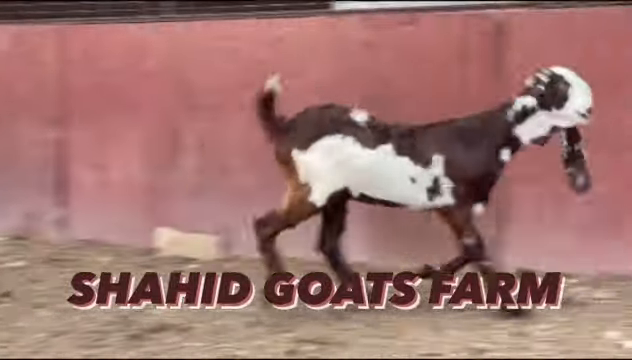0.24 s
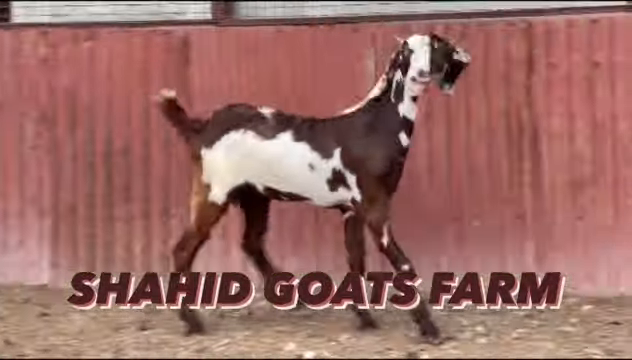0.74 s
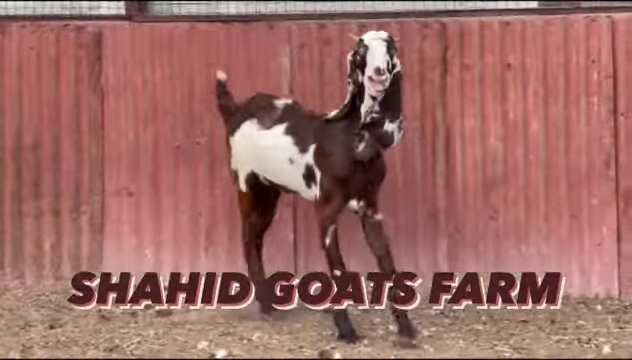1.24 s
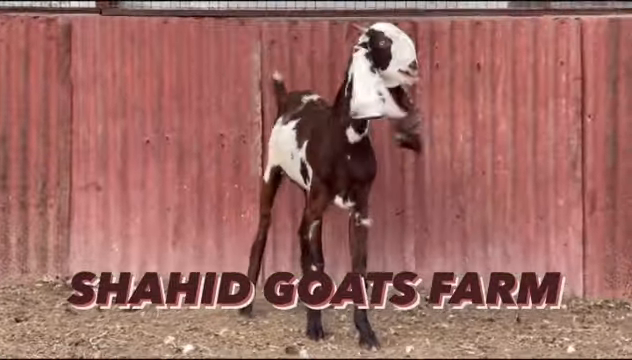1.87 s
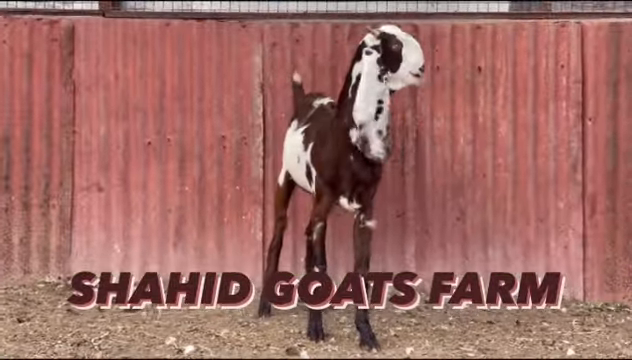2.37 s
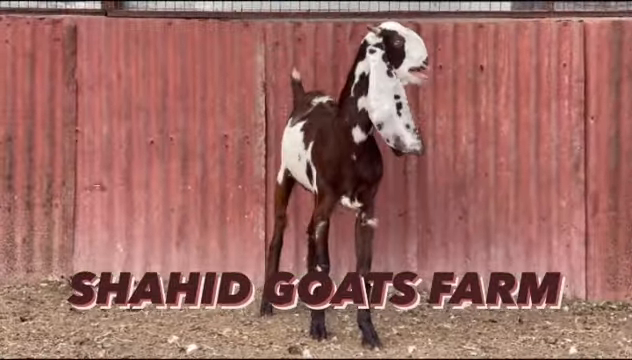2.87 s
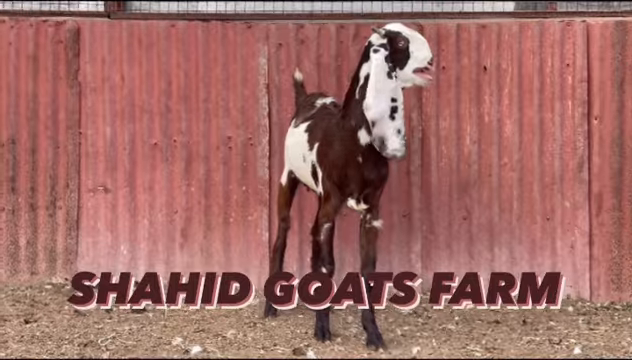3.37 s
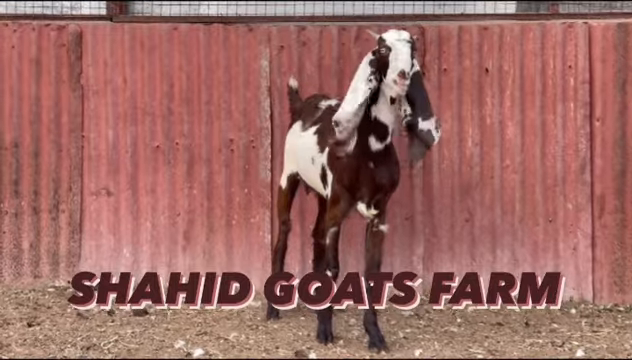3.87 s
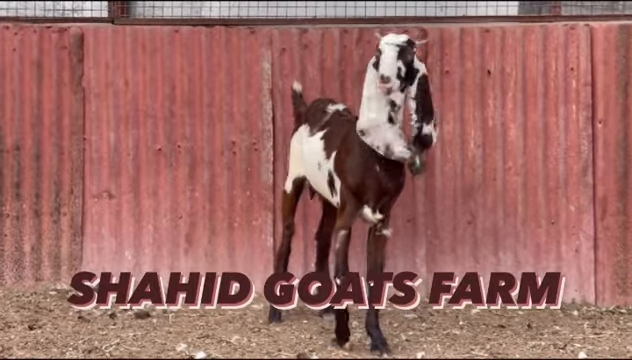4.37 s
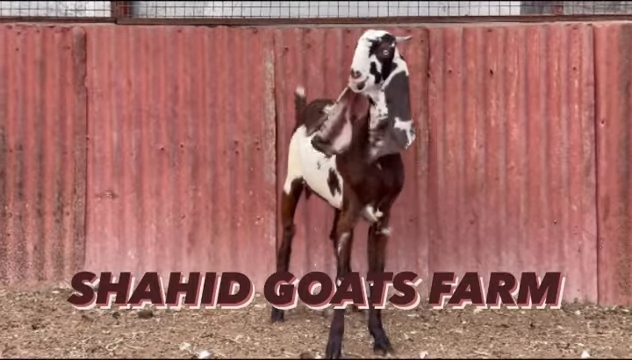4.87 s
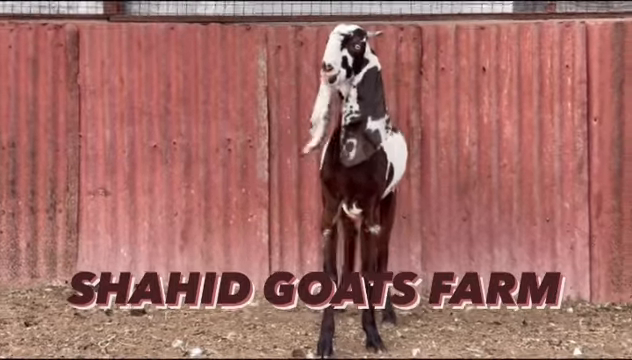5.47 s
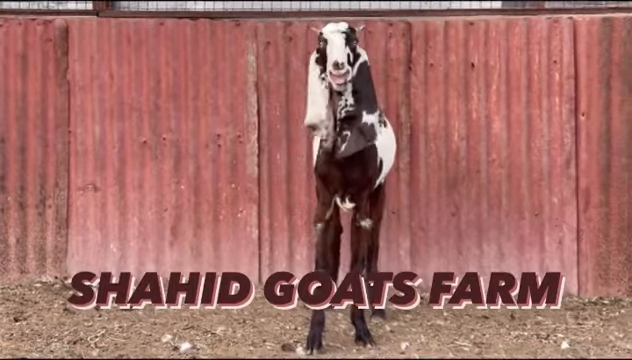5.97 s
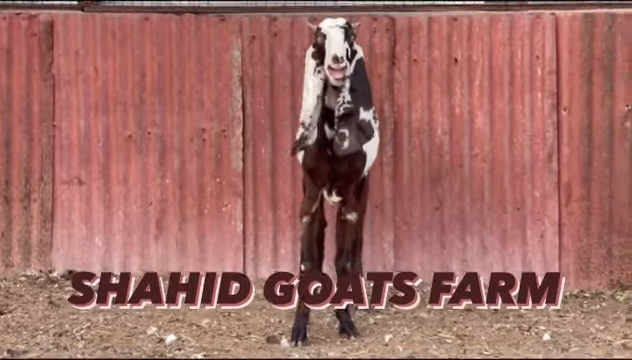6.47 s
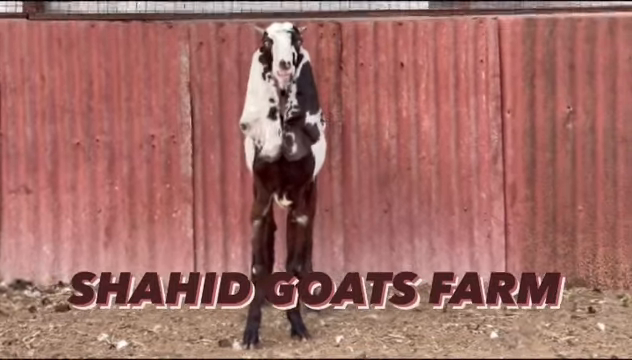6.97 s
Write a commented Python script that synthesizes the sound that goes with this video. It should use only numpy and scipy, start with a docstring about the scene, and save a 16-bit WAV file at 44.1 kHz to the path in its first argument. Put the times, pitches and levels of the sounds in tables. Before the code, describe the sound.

A young goat calls three times, about a second each, nasal and bright with a rapid tremble and an abrupt closing end. The first begins with a rough grunt. After the second, dull thumps and crisp clicks like hooves shifting interrupt the quiet, then the last bleat comes. Distant birds chirp faintly over soft rumble, rustle and hiss. Phone pickup, open air, short metal-fence echoes.

```python
"""A goat kid bleats three times in a dirt pen with a sheet-metal fence, a few metres from a phone.
Fold pulses and breath ring its throat: each bleat starts low, jumps to its pitch, and is shaken by pushes
of breath that lift the pitch and open the throat. Ground and fence echo it.
Noise bursts and damped rings make thuds, booms, ticks and a rough grunt; far birds sing in sine notes;
behind lies the yard, shaped noise that rumbles, hisses, rustles and carries hoarse far-off calls."""
import sys
import numpy as np
from scipy import signal
from scipy.fft import rfft, irfft, next_fast_len
from scipy.io import wavfile

SR = 44100
rng = np.random.default_rng(int(sys.argv[2]) if len(sys.argv) > 2 else 0)


def wav_out(sig):
    """Save sig, one row per channel (or a flat mono array), as 16-bit PCM at SR to the path in sys.argv[1]."""
    wavfile.write(sys.argv[1], SR, np.round(np.clip(np.atleast_2d(sig).T, -1, 1) * 32767).astype(np.int16))


N = 318402
T = np.arange(N) / SR
SIDES = np.array([[1], [-1]])  # left, right
TOP_HZ = 11900  # the scene is rendered up to this frequency


def undb(db):
    """Decibels to gain."""
    return 10 ** (np.asarray(db) / 20)


def unit(x):
    """Scale to rms 1."""
    return x / np.sqrt(np.mean(x ** 2))


def filtered(x, response):
    """Pass a sound through a response given as a function of frequency."""
    n = x.shape[-1]
    size = next_fast_len(n + SR // 10, True)
    hz = np.maximum(np.arange(size // 2 + 1) * SR / size, 1)
    return irfft(rfft(x, size) * response(hz), size)[..., :n]


def lowpassed(x, cut_hz):
    """Keep what lies below a cut, without delay."""
    return filtered(x, lambda f: 1 / (1 + (f / cut_hz) ** 4))


def resonate(x, hz, width):
    """One resonance, gain 1 at its centre."""
    return filtered(x, lambda f: 1 / (1 + 1j * (f / hz - hz / f) * hz / width))


def walk(rate, size):
    """Smooth chance that changes about rate times a second; spread 1."""
    return unit(filtered(rng.standard_normal(size), lambda f: 1 / (1 + (f / rate) ** 2)))


def bell(t, centre, half):
    """A smooth rise and fall."""
    return np.exp(-((t - centre) / half) ** 2)


def add(track, s, x):
    """Mix a sound into a track from time s on."""
    i = max(int(s * SR), 0)
    track[..., i:i + x.shape[-1]] += x[..., :N - i]


def colour(f, rows):
    """Join (Hz, value) rows by straight lines on a log-frequency axis."""
    hz, value = np.transpose(rows)
    return np.interp(np.log(f), np.log(hz), value)


def swell(s, half, hz, width):
    """A narrow band of noise rises and falls."""
    band = resonate(resonate(rng.standard_normal(N), hz, width), hz, width)
    return bell(T, s, half) * unit(band)


YARD_DB, HISS_DB = -59, -1  # the whole yard before its bands are weighted; steady hiss relative to that
RUMBLE_WIDTH_HZ, RUMBLE_S = 21, 0.12  # bandwidth and half length of each brief rumble
FAR_CALL_HZ, FAR_CALL_WIDTH_HZ, FAR_CALL_S = 2100, 500, 0.11  # centre, bandwidth, half length
# Spectrum of the yard's air. Each row: frequency in Hz, relative level in dB per Hz.
YARD_COLOUR = [(15, -38), (25, -27), (49, -1), (149, -8.5), (262, -9), (283, -11), (386, -6.5), (718, -15),
               (2240, -18.5), (4610, -28), (5820, -27), (6290, -31.5), (8800, -25.5), (12000, -38.5),
               (15600, -96), (22000, -120)]
# Rumble of the yard over time. Each row: time in seconds, level in dB over the yard's own.
RUMBLE_LEVEL = [(0, 1.5), (1.5, 8), (2.3, 7), (3.8, 5.5), (4.05, 3), (4.8, 7), (5.45, -2.5), (6.2, 4.5)]
# Soft rustle from movement in the pen. Each row: centre in seconds, half length in seconds, dB over the hiss.
RUSTLES = [(0.206, 0.67, 5.5), (4.47, .22, 11), (6.65, 0.34, 6)]
# Brief swells of rumble. Each row: centre in seconds, frequency in Hz, level in dB.
RUMBLES = [(1.373, 55.1, -53), (2.01, 145.2, -55.5), (7.08, 52, -46)]
# Hoarse far-off calls. Each row: centre in seconds, level in dB.
FAR_CALLS = [(2.2, -62.5), (6.775, -53)]


def yard(side_db=-14, swell_db=1, rumble_swell_db=3.0):
    """Distant rumble and hiss waver, nearly alike on both sides, with rustles and noise-band far calls."""
    mid, side = (unit(filtered(rng.standard_normal(N), lambda f: undb(colour(f, YARD_COLOUR))))
                 for _ in range(2))
    air = undb(YARD_DB) * (mid + SIDES * undb(side_db) * side)
    low = lowpassed(air, 200)
    high = air - lowpassed(air, 3000)
    middle = air - low - high
    rumble_db = np.interp(T, *np.transpose(RUMBLE_LEVEL))
    hiss_db = HISS_DB + sum(db * bell(T, s, half) for s, half, db in RUSTLES)
    out = low * undb(rumble_db + rumble_swell_db * walk(15, N))
    out = out + high * undb(hiss_db + swell_db * walk(10, N))
    out = out + middle * undb((rumble_db + hiss_db) / 2 + swell_db * walk(16.0, N))
    for s, hz, db in RUMBLES:
        out = out + undb(db) * swell(s, RUMBLE_S, hz, RUMBLE_WIDTH_HZ)
    for s, db in FAR_CALLS:
        out = out + undb(db) * swell(s, FAR_CALL_S, FAR_CALL_HZ, FAR_CALL_WIDTH_HZ)
    return out


def pen(x, t60, treble_t60, split_hz=3500, side_db=-10):
    """Fence and sheds scatter echoes, a little different per side; bass and treble die at their own rates."""
    t = np.arange(SR) / SR
    mid, side = rng.standard_normal((2, SR)) * np.clip((t - .004) / 0.037, 0, 1)
    noise = mid + SIDES * undb(side_db) * side
    low = lowpassed(noise, split_hz)
    tail = low * np.exp(-np.log(1000) * t / t60)  # down 60 dB at t60 seconds
    tail = tail + 0.26 * (noise - low) * np.exp(-np.log(1000) * t / treble_t60)
    return signal.fftconvolve(x[None], tail / np.sqrt(np.sum(tail ** 2) / 2), axes=1)[:, :N]


def note(length, hz, fall, octave_db, waver=0.0078, flutter_db=3, hold=2.8):
    """A fluttering sine note holds, then falls, with its octave above."""
    u = np.linspace(0, 1, int(length * SR))
    pitch = hz * (1 - fall * u ** hold + waver * walk(120, len(u)))
    phase = 2 * np.pi * np.cumsum(pitch) / SR
    size = undb(flutter_db * walk(80, len(u))) * np.sqrt(u * (1 - u)) * 2
    return size * (np.sin(phase) + undb(octave_db) * np.sin(2 * phase))


# The bird's phrase, each note higher than the last. Each row: pitch ratio, length in seconds,
# share by which it falls, level in dB, octave in dB relative to the note.
NOTES = [(1, .068, .18, 0, -5), (1.25, .072, .22, -0.5, -11), (1.61, .04, 0.26, -6.5, -20)]
# Each time it sings. Each row: start in seconds, pitch in Hz, level in dB, time between note starts
# in seconds, extra level of the later notes in dB.
PHRASES = [(.247, 3396, -55, 0.044, -3.5), (2.424, 3710, -52.5, 0.06, 3.5), (4.295, 3680, -58, .068, -22),
           (6.702, 3720, -49.5, 0.07, -3)]
# Thin, nearly level whistles. Each row: start in seconds, length in seconds, pitch in Hz, level in dB.
WHISTLES = [(0.798, 0.33, 6330, -47.5), (5.011, .25, 5880, -70.5), (7.03, 0.18, 2780, -67)]


def birds(echo_s=0.021, echo_db=-5):
    """Far birds: phrases of three falling notes and a few thin whistles; a wall repeats them once."""
    song = np.zeros(N)
    for s, hz, db, gap_s, later_db in PHRASES:
        for k, (ratio, length, fall, note_db, octave_db) in enumerate(NOTES):
            level = undb(db + note_db + later_db * (k > 0))
            add(song, s + k * gap_s, level * note(length, hz * ratio, fall, octave_db))
    for s, length, hz, db in WHISTLES:
        add(song, s, undb(db) * note(length, hz, fall=0.0092, octave_db=-30, waver=0.0047))
    out = song.copy()
    add(out, echo_s, undb(echo_db) * song)
    return out


def crack(t, hz, width, decay_s, grit_db=4, skirt=2.6):
    """A rough burst of band-limited noise that dies quickly."""
    grit = rng.standard_normal(len(t)) * undb(grit_db * walk(600, len(t)))
    return unit(resonate(resonate(grit, hz, width), hz, skirt * hz)) * np.exp(-t / decay_s)


SETTLE_DB, SETTLE_S = -19.5, 0.04  # level and decay of the rumble that follows each thud


def thud(t, hz, decay_s):
    """The first swing is clean, then the ring breaks up into a broad rumble that settles."""
    rumble = unit(resonate(rng.standard_normal(len(t)), hz, hz))
    swing, fade = np.exp(-t * hz / 4), np.exp(-t / decay_s)
    ring = swing * fade * np.sin(2 * np.pi * hz * t)
    settling = 0.87 * fade + undb(SETTLE_DB) * np.exp(-t / SETTLE_S)
    return lowpassed(ring + (1 - swing) * rumble * settling, 2 * hz)


CRACK_HZ, CRACK_WIDTH_HZ = 2240, 1400
THUD_CYCLES, BOOM_CYCLES = 1.25, 3.3  # swings in which the fade drops to 1/e
# Knocks and thuds; a hoof lands at .667 as the first bleat begins. Each row: start in seconds, thud in dB, thud
# in Hz, crack in dB, crack decay in seconds.
KNOCKS = [(.046, -25, 198, -58.5, .01), (.667, -26, 224, -44.5, 0.057), (4.157, -28.5, 310, -47, 0.0038),
          (4.4331, -10.5, 367, -30, 0.0042), (4.4578, -24, 420, -40, .012), (4.519, -44, 380, -37.5, .004),
          (4.542, -34, 443, -42, 0.0054), (4.659, -29.5, 282, -39, 0.011)]
# Deep booms. Each row: start in seconds, level in dB, frequency in Hz.
BOOMS = [(4.165, -39.5, 66), (4.426, -23, 128), (4.454, -33, 120), (4.67, -29.5, 61.6), (4.826, -43, 55)]
# Ticks and scrapes: short noise bursts, among them a rough grunt at .636 and lips parting at 5.714.
# Each row: start in seconds, level in dB, centre in Hz, decay in seconds.
TICKS = [(.041, -45, 1000, .003), (.636, -41, 710, 0.05), (4.1585, -35, 1200, 0.0065),
         (4.2445, -26.5, 3830, 0.0016), (4.268, -47, 3460, 0.0041), (4.415, -45, 2800, 0.015),
         (4.432, -24, 8100, .002), (4.625, -30, 10100, 0.0011), (4.651, -44.5, 6900, 0.0063),
         (5.497, -52, 6540, .004), (5.579, -51.5, 7100, 0.0071), (5.714, -34.5, 7160, 0.0054)]


def knocks():
    """Rough cracks over soft, damped thuds, with deep booms and short noise bursts; a grunt is among them."""
    out, t = np.zeros(N), np.arange(SR // 3) / SR
    for s, thud_db, thud_hz, crack_db, crack_s in KNOCKS:
        add(out, s, undb(thud_db) * thud(t, thud_hz, THUD_CYCLES / thud_hz))
        add(out, s, undb(crack_db) * crack(t, CRACK_HZ, CRACK_WIDTH_HZ, crack_s))
    for s, db, hz in BOOMS:
        add(out, s, undb(db) * thud(t, hz, BOOM_CYCLES / hz))
    for s, db, hz, decay_s in TICKS:
        add(out, s, undb(db) * crack(t, hz, 0.54 * hz, decay_s))
    return out


# Phase between the two microphone ports. Each row: frequency in Hz, lead of the left in radians.
PORT_PHASE = [(100, -0.5), (350, 0.15), (900, 0.42), (1900, 0.16), (3300, 0.79), (5500, 0.33),
              (7200, -1.16), (8300, -0.5), (9700, -2.5), (12000, -1.6)]
# Level between the ports. Each row: frequency in Hz, left minus right in dB.
PORT_BALANCE = [(150, 7), (380, -2), (700, 1), (1300, 5), (2400, -0.5), (4400, 0), (8000, 0)]


def ports(x):
    """A sound from the front reaches the two ports with a difference in level and phase."""
    def response(f):
        """Half the difference goes to each side, with opposite sign."""
        return undb(SIDES * colour(f, PORT_BALANCE) / 2) * np.exp(1j * SIDES * colour(f, PORT_PHASE) / 2)
    return filtered(x, response)


def folds(t, hz, lift, rasp, jitter=0.00316, slack_jitter=0.017, rasp_jitter=0.0167, shimmer=0.012,
          breath_db=-1, rasp_breath=1.8, breath_hz=5000, slack_hz=283, zip_rad=.07, uneven_db=2.5):
    """Vocal folds make uneven pulses, and air hisses once each cycle; returns both together, and the air."""
    # they beat unevenly when slack, at low pitch
    slack = 1 / (1 + np.exp((hz - slack_hz) / 8))
    wobble = (jitter + slack_jitter * slack + rasp_jitter * rasp) * walk(173, len(t))
    phase = 2 * np.pi * np.cumsum((hz + lift) * (1 + wobble)) / SR
    # the folds close like a zip, so each pulse is spread in time, and its upper harmonics waver most
    pulses = 0
    for k in range(1, int(TOP_HZ / np.median(hz)) + 1):
        uneven = undb(uneven_db * min(k / 10, 1) * walk(14.2, len(t)))
        pulses = pulses + np.cos(k * phase - zip_rad * k ** 2) * uneven
    pulses = pulses * (1 + shimmer * (1 + 2 * rasp) * walk(74, len(t)))
    air = rng.standard_normal(len(t)) * (1 + np.cos(phase)) * undb(breath_db) * (1 + rasp_breath * rasp)
    air = filtered(air, lambda f: f / (f + breath_hz))  # mostly treble
    fade_in, fade_out = np.clip((t - t[0]) / 0.033, 0, 1) ** 2, np.clip((t[-1] - t) / 0.0053, 0, 1)
    return (pulses + air) * fade_in * fade_out, air


CREST_SHARE = 0.71  # effort peaks this far through the open call
START_HZ, MURMUR_HZ, END_HZ = 231.4, 265.5, 228.3  # pitch at first, just before the break, and at the last
BREAK_S, FALL_S = 0.012, 0.025  # how fast the pitch breaks upward, and how fast it collapses at the end
MURMUR_TILT_DB, CLOSING_TILT_DB = -2, -0.5  # brightness per octave: in the murmur, added as the mouth closes
RELEASE_S, RELEASE_DB = 0.032, -14  # the dying of the voice
SURGE_DB, SURGE_S = 2.5, 0.048  # the call surges once before the pushes begin
MOUTH_CUT_HZ = 268  # the small mouth radiates little below this
# Pushes of breath. Each row: centre in seconds, half length in seconds, pitch lift in Hz.
PUSHES = [(0.998, 0.019, 18.6), (1.106, 0.019, 31), (1.207, 0.025, 29), (1.335, 0.056, 18.6),
          (1.461, 0.033, 18.7), (1.587, 0.019, 19.6), (2.825, 0.02, 7.5), (2.936, 0.021, 14.6),
          (3.051, 0.024, 17.3), (3.163, 0.024, 21.6), (3.281, 0.026, 23.4), (3.404, 0.026, 23.3),
          (6.139, 0.022, 9), (6.256, 0.021, 15), (6.371, 0.021, 16.4), (6.482, 0.02, 19.5)]


def bleat(times, voicing, throat, hiss_hz=7900, hiss_width=1200, full_push_hz=13, push_snap=1.27,
          flutter_db=1.33, lips_hz=830, lips_width=160, lips_db=7, lips_lead_s=0.021, lips_s=0.0097,
          hum_hz=580, hum_delay_s=0.041, hum_s=0.029, notch_hz=3950, notch_width=220, notch_depth=0.33):
    """Fold pulses and the air between them ring the throat; pushes lift the pitch and open it."""
    start, breaks, surge, end = times
    top_hz, climb_hz, hum_db, murmur_db, full_db, swell_s, first_bright, top_bright, hiss_db = voicing
    t = np.arange(start, end + 0.011, 1 / SR)
    # a low murmur breaks into the open call; one arch of effort then carries pitch and brightness
    opened = (1 + np.tanh((t - breaks) / BREAK_S)) / 2
    since_break = np.maximum(t - breaks, 0)
    effort = 1 - (1 - since_break / (CREST_SHARE * (end - breaks))) ** 2
    collapse = np.exp(-(np.maximum(end - t, 0) / FALL_S) ** 1.4)
    murmur_hz = np.interp(t, [start, breaks], [START_HZ, MURMUR_HZ])
    hz = (1 - opened) * murmur_hz + opened * (top_hz - climb_hz * (1 - effort))
    hz = hz + (END_HZ - hz) * collapse
    open_bright = first_bright + (top_bright - first_bright) * effort
    bright = (1 - opened) * MURMUR_TILT_DB + opened * open_bright + CLOSING_TILT_DB * collapse
    # the level swells from the murmur, surges, holds, and is released
    level_db = full_db + (murmur_db - full_db) * np.exp(-since_break / swell_s)
    level_db = level_db + SURGE_DB * bell(t, surge, SURGE_S)
    level_db = level_db + RELEASE_DB * np.clip(1 - (end - t) / RELEASE_S, 0, 1)
    pushes = [push for push in PUSHES if start < push[0] < end]
    lift = sum(lift_hz * bell(t, at, half) for at, half, lift_hz in pushes)
    strain = np.tanh((lift / full_push_hz) ** push_snap)
    # the folds rasp as each push lets go
    rasp = sum(lift_hz / 20 * bell(t, at + 0.896 * half, 0.0095) for at, half, lift_hz in pushes)
    source, air = folds(t, hz, lift, rasp)
    # the call starts with a short hum through the nose while the mouth opens
    hum = undb(hum_db) * bell(t, start + hum_delay_s, hum_s) * lowpassed(source, hum_hz)
    mouth = np.clip((t - start) / (hum_delay_s + hum_s), 0, 1)
    # the closing lips end the call with a short hoot
    hoot = undb(full_db + lips_db) * bell(t, end - lips_lead_s, lips_s)
    voice = hoot * resonate(source, lips_hz, lips_width)
    # some of the air whistles past the teeth
    teeth_gain = undb(level_db + hiss_db + bright * np.log2(hiss_hz / 1000))
    voice = voice + mouth * teeth_gain * resonate(air, hiss_hz, hiss_width)
    for k, (f, width, db, push_db) in enumerate(throat):
        # tongue and jaw tremble, which stirs the upper resonances most
        flutter = flutter_db * min(f / 2500, 1) * walk(34, len(t))
        gain = undb(level_db + db + push_db * strain + flutter + bright * np.log2(f / 1000))
        voice = voice + (-1) ** k * mouth * gain * resonate(source, f, width)
    voice = hum + filtered(voice, lambda f: 1 / np.sqrt(1 + (MOUTH_CUT_HZ / f) ** 12))
    # a side cavity of the throat swallows part of a band above the strong resonances
    return voice - notch_depth * resonate(voice, notch_hz, notch_width)


# Timing of the bleats. Each row: start, upward break of the voice, first surge and end, all in seconds.
BLEAT_TIMES = [(0.614, 0.695, 0.89, 1.662), (2.468, 2.582, 2.74, 3.505), (5.598, 5.712, 6.04, 6.555)]
# Voicing of each bleat. Each row: top pitch in Hz before pushes, climb to it in Hz, hum in dB, murmur in dB,
# full call in dB, swell in seconds, first and top brightness in dB per octave, hiss in dB over the call.
BLEATS = [(317.5, 28, -34.5, -53.5, -29.5, 0.1, -1.8, 2.95, -19),
          (322.44, 20, -43.5, -36.5, -28.5, 0.013, 0.67, 4.12, -32),
          (313.1, 20, -39, -39.5, -26, 0.11, 1.9, 1.2, -29)]
# Resonances of nose and throat, one list per bleat. Each row: centre in Hz, width in Hz, level in dB
# over the call, extra dB at a full push.
THROATS = [
    [(286, 180, -11, 15), (656, 97, 1.5, 9.5), (925, 117, 2, 7.5), (1562, 105, -1.5, 12),
     (1880, 210, -10, 10.5), (2650, 940, -14.5, 7.5), (3540, 253, -6.5, 3.5), (4930, 710, -23, 2),
     (7160, 1540, -30, 5), (10950, 360, -27.5, -10.5)],
    [(320, 630, -10.5, 10.5), (705, 98, 0, 10.5), (907, 30.0, 6, 14.5), (1668, 104, -3.5, 9),
     (1927, 58, -7, 5.5), (2730, 870, -17.5, 7), (3560, 224, -10.5, 6.0), (5020, 1250, -26.5, 0),
     (5940, 1620, -28.5, 3), (10900, 82, -30.5, 0)],
    [(336, 484, -5.5, 3), (876, 147, 10, 2.5), (868.6, 119, 6.5, -28), (1604, 286, -5, -4),
     (1995, 730, -15, 0.5), (2730, 480, -13.5, -5), (3620, 390, -14.0, 6), (5090, 400, -21.0, 4),
     (6550, 2800, -32, 7.5), (11020, 310, -31.5, -5)],
]
# Echo paths of each bleat. Each row: ground echo in ms, its gain, fence echo in ms, its gain.
ECHO_PATHS = [(1.164, 0.31, 8.43, 0.19), (1.17, 0.14, 5.77, 0.36), (1.168, 0.45, 9.7, 0.034)]


def goat(fence_top_hz=2500):
    """The bleats, each with its delayed echoes from the ground and the corrugated fence."""
    out = np.zeros(N)
    for times, voicing, throat, echoes in zip(BLEAT_TIMES, BLEATS, THROATS, ECHO_PATHS):
        ground_ms, ground, fence_ms, fence = echoes

        def paths(f):
            """Direct sound and two echoes; the ribs of the fence scatter the treble away."""
            turn = -2j * np.pi * f / 1000  # phase per ms of delay
            fence_echo = fence * np.exp(turn * fence_ms) / (1 + 1j * f / fence_top_hz)
            return 1 + ground * np.exp(turn * ground_ms) + fence_echo
        call = np.pad(bleat(times, voicing, throat), (0, SR // 20))  # room for the echoes
        add(out, times[0], filtered(call, paths))
    return out


def scene(knock_pan_db=1.6):
    """Goat, knocks and birds in the pen, over the yard."""
    kid, bumps, far = goat(), knocks(), birds()
    near = kid + bumps
    close_echoes = undb(-18) * pen(near, t60=.09, treble_t60=.18)
    late_echoes = undb(-28) * pen(near, t60=.85, treble_t60=.9)
    bird_echoes = undb(-6) * pen(far, t60=0.64, treble_t60=1.0)
    front = ports(kid + close_echoes + late_echoes)
    panned_bumps = bumps * undb(SIDES * knock_pan_db / 2)  # a little to the left
    return front + panned_bumps + far + bird_echoes + yard()


def record(dry, low_cut_hz=38):
    """The phone drops the deepest rumble; the top is left out."""
    thin = signal.sosfilt(signal.butter(4, low_cut_hz, "highpass", fs=SR, output="sos"), dry)
    return signal.sosfilt(signal.ellip(8, .2, 70, TOP_HZ, fs=SR, output="sos"), thin)


dry = scene()
out = record(dry)
wav_out(out)
```